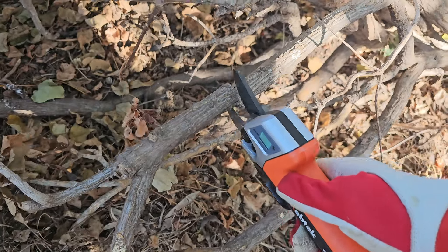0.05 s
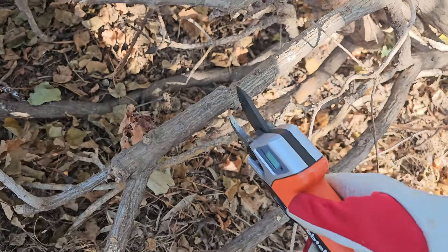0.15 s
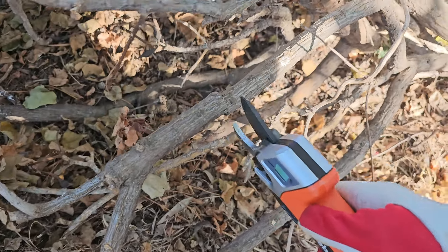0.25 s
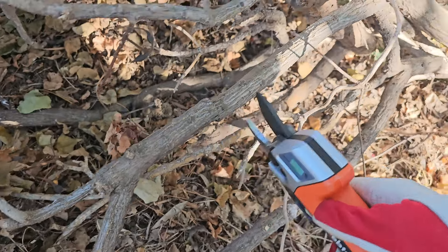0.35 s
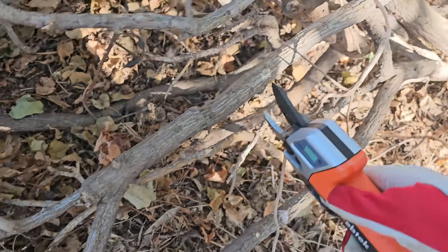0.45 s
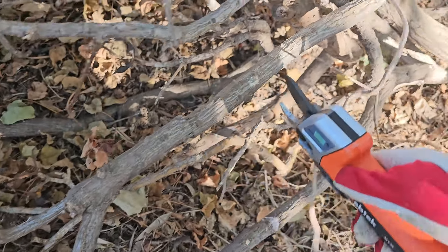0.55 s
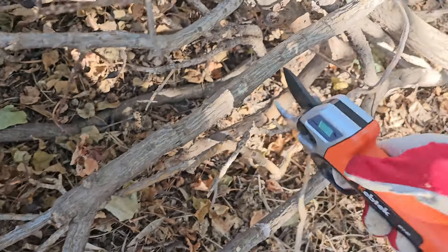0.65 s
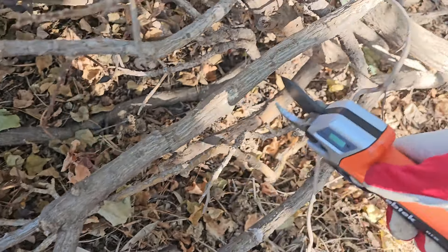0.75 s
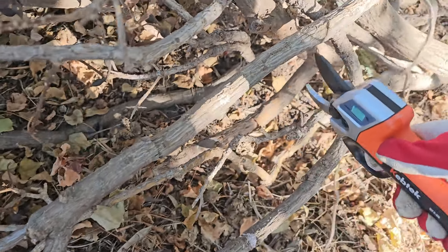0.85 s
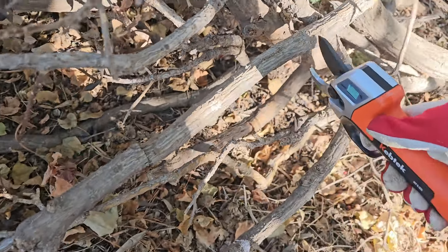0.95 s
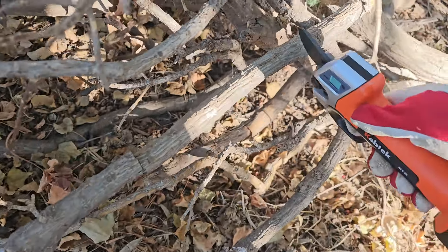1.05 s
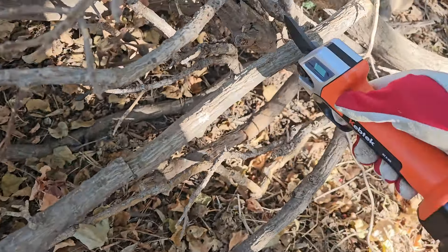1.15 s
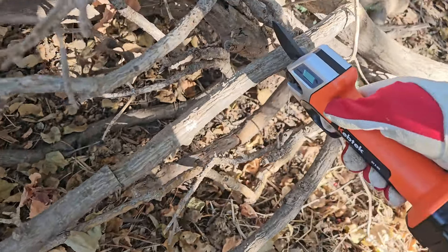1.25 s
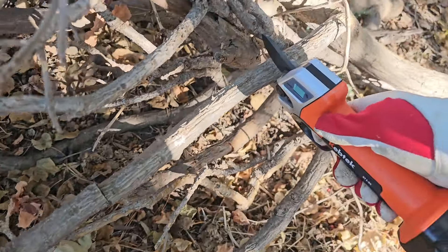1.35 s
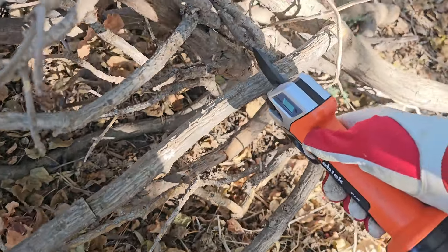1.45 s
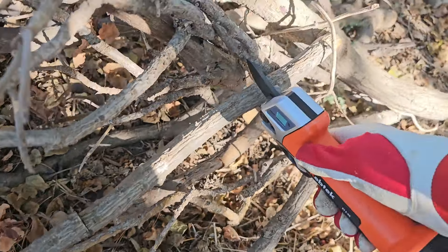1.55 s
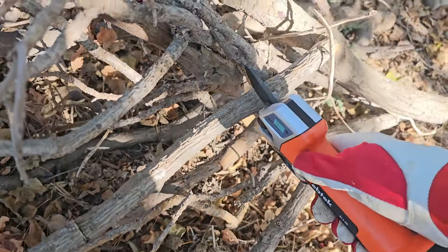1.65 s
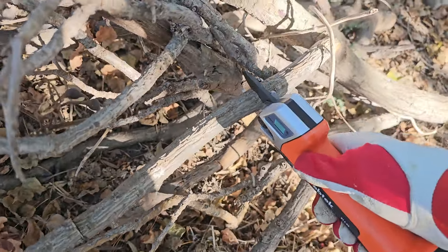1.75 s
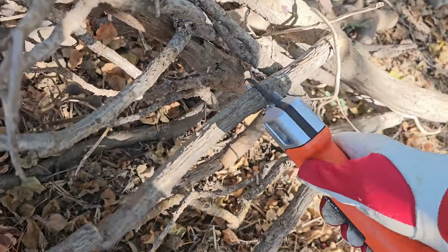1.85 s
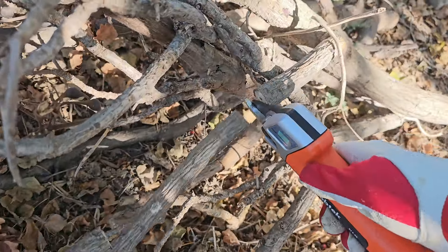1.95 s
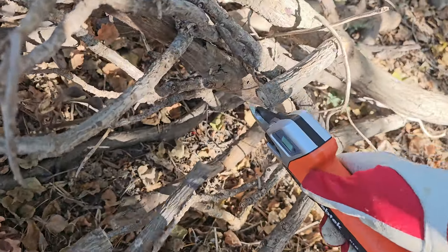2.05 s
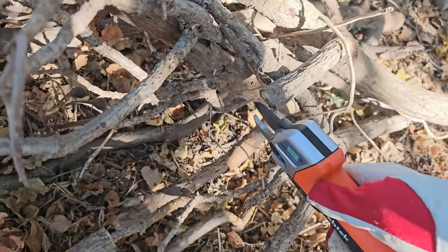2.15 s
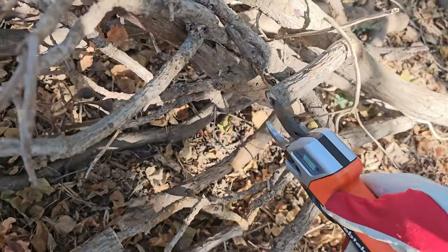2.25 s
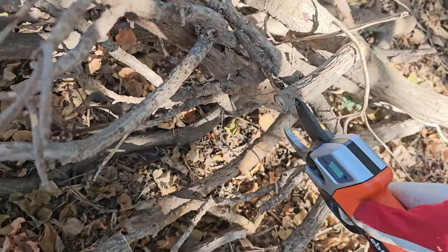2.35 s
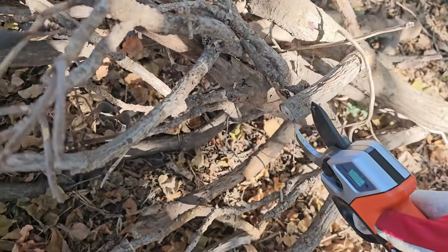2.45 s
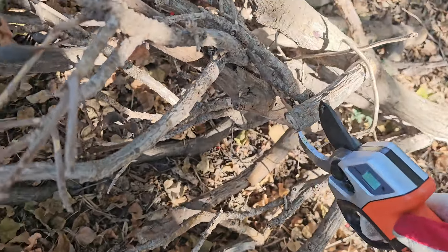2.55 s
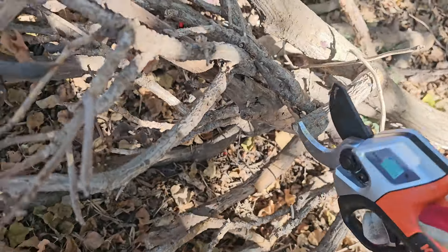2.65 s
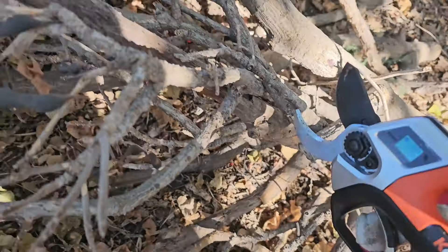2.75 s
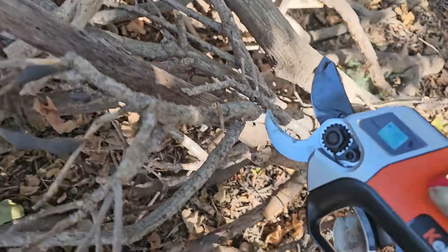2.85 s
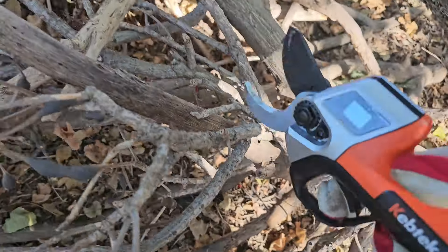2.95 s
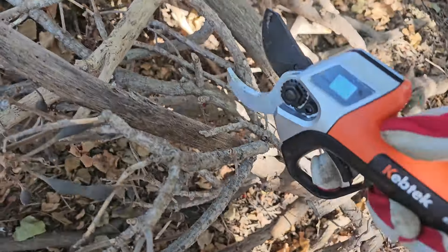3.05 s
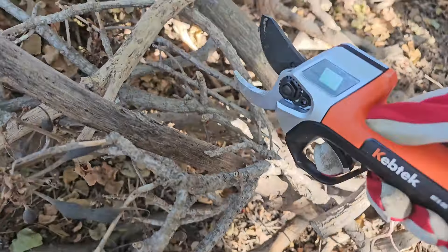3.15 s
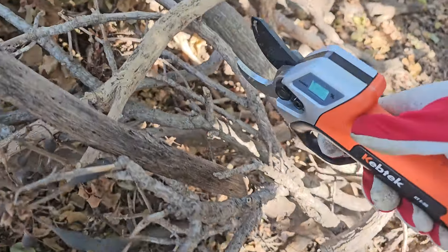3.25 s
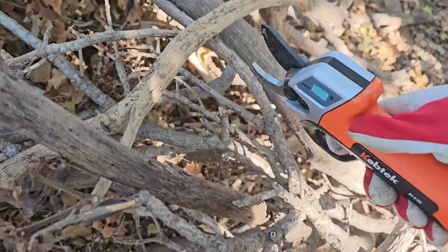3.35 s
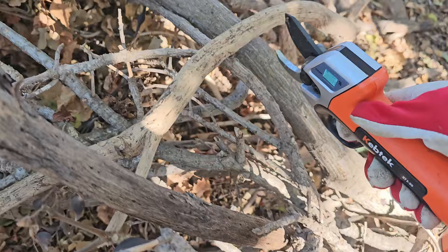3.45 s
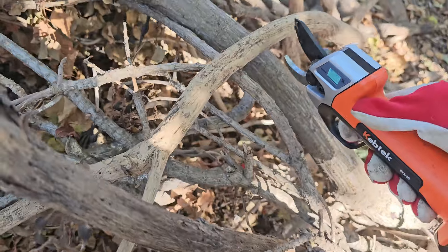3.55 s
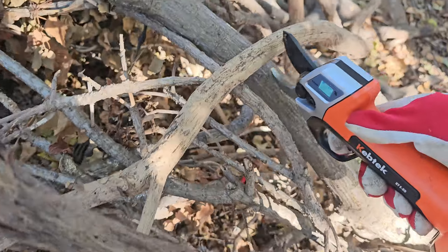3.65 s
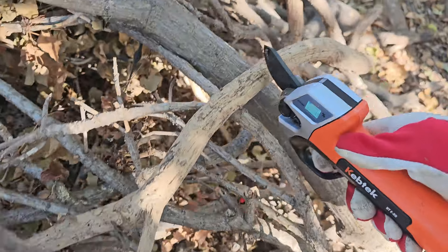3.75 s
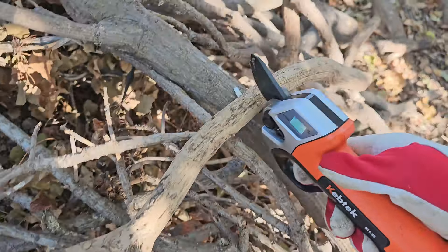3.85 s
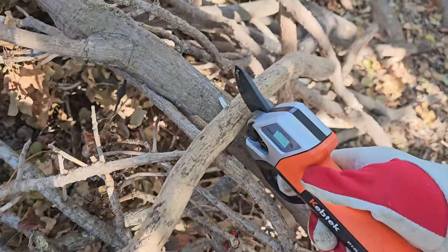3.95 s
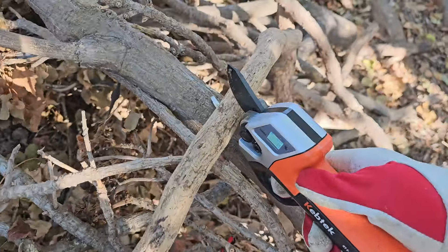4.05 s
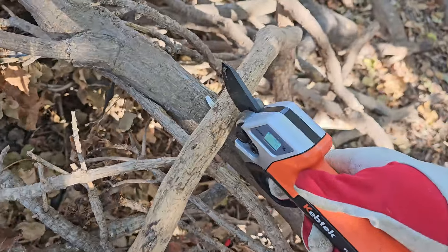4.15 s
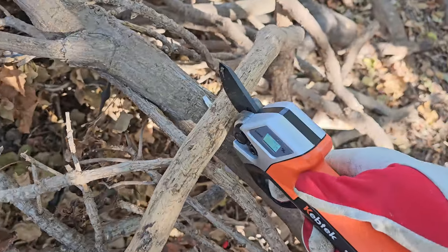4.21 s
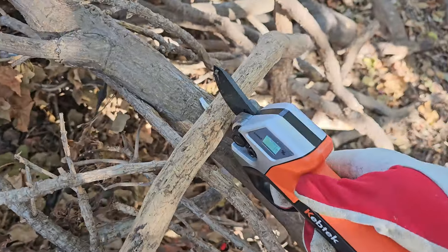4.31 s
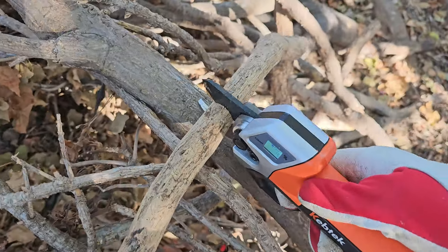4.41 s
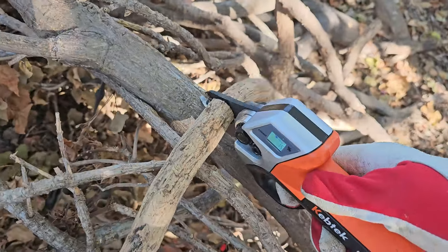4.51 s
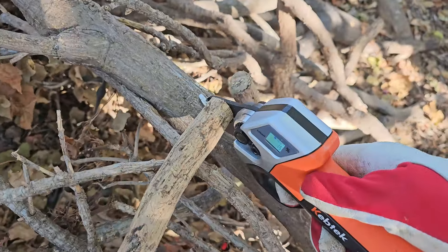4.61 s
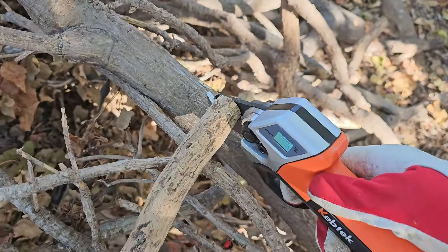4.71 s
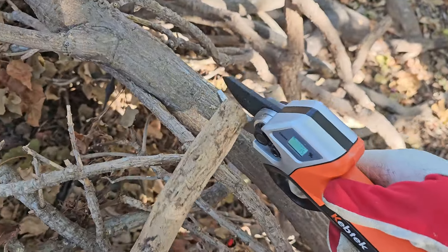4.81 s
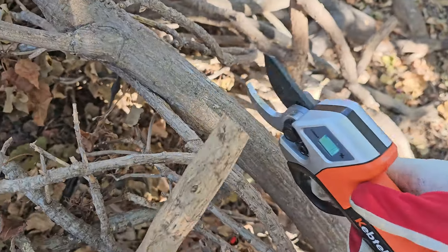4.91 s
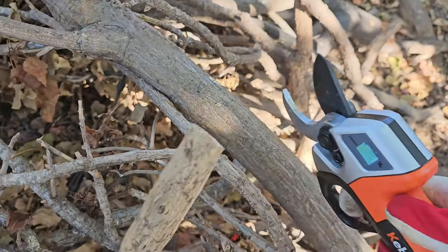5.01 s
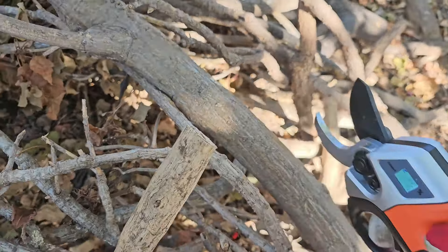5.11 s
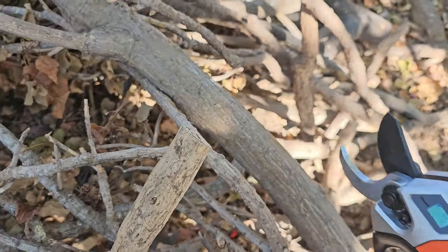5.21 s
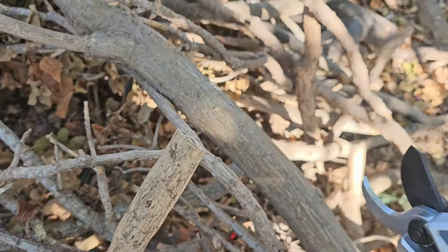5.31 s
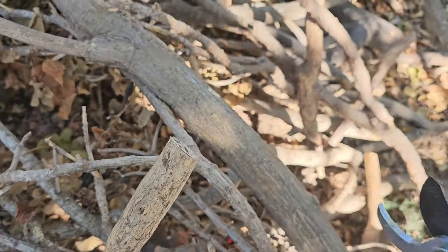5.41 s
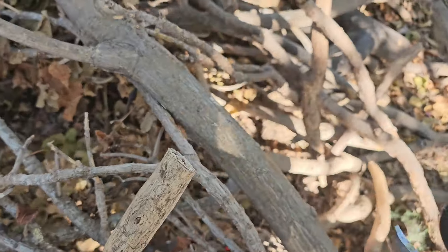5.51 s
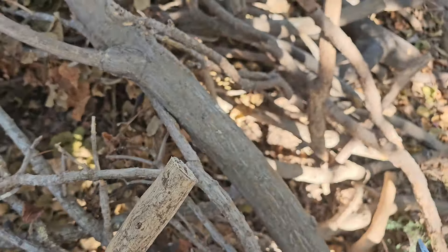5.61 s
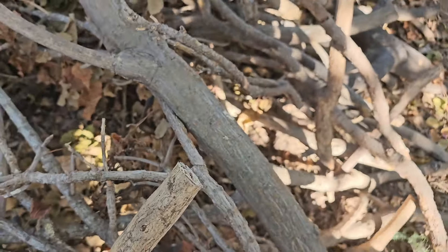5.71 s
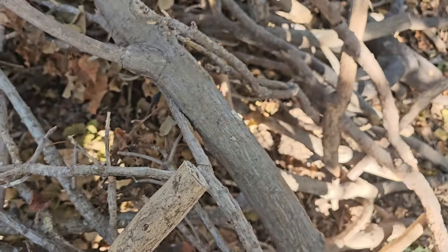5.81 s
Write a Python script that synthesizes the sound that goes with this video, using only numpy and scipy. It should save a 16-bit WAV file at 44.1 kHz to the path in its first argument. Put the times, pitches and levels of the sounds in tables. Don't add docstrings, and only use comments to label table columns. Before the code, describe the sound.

A small geared motor winds down, then twice clicks, whines and bites through wood with a loud crack, as dry leaves and twigs rustle.

```python
import sys
import numpy as np
from scipy import signal
from scipy.fft import rfft, irfft
from scipy.io import wavfile
from scipy.ndimage import uniform_filter1d

SR = 44100
rng = np.random.default_rng(int(sys.argv[2]) if len(sys.argv) > 2 else 0)


def bounce(signal):
    frames = np.transpose(np.atleast_2d(signal))
    limited = np.clip(frames, -1, 1)
    pcm = np.round(limited * 32767).astype(np.int16)
    wavfile.write(sys.argv[1], SR, pcm)


def linear_from_db(decibels):
    return 10 ** (np.asarray(decibels, float) / 20)


N = 258867

# (power on [s], power off [s], rattle [dB], whine [dB], brightness [dB])
OPENING = [
    (-.2, 0.092, -34.5, -35.5, -11),
    (2.114, 2.36, -34, -34.5, -9),
    (4.79, 5.04, -32.5, -28, -9),
]
# (power on [s], power off [s], rattle [dB], whine [dB], brightness [dB])
CLOSING = [
    (1.728, 1.974, -34, -27.5, -8.5),
    (4.364, 4.614, -31, -21.5, -9),
]
# (time [s], speed lost as whine [Hz], crush above rattle [dB], strained line [dB], groan [dB])
RESISTANCE = [
    (1.9, 471.2, 14, -29, -33),
    (4.51, 390, 9.5, -27.5, -38.5),
]
# (left-right [dB], left leads [rad], turning [dB/s])
WHINE_AIM = [
    (-13.5, 1.2, 0),
    (-9.5, -2.5, -58),
    (8.5, 4, 10),
    (0, 0.5, -2),
    (-1, -0.5, 0),
]
GEAR_HZ = [780.6, 985, 1561, 1647, 2304, 3120, 3375, 3709, 3900, 3951, 4678, 7079, 7327]
# (level [dB], left-right [dB], change along the stroke [dB/s])
GEARS = [(-4.5, -0.5, 12), (-4, 1, 11), (-9.5, 3, -19), (-6, 4, -22), (-7.5, -11, 0), (-5.5, 2, -19),
         (-14.5, 5, -3), (-4.5, 7, -4), (-2, -2, -22), (-7, 11, -12), (-11, 2, 3), (-17, 2, 0),
         (-5, 11, 16)]
# (frequency [Hz], density [dB per Hz])
FREE_COLOUR = [(240, -17), (400, -17), (710, -4.5), (777, -1), (970, 4), (1210, -5), (1590, 3.5),
               (2180, -15.5), (3520, 1.5), (3810, -5), (4940, -2), (5410, -4.5), (5860, -9.5), (7500, -2),
               (9000, -12), (11700, -99), (19800, -120)]
# (frequency [Hz], density [dB per Hz])
LOADED_COLOUR = [(240, -21), (400, -30.5), (656, -15), (738, -10), (1190, -13), (1450, 4), (2010, -22.5),
                 (2090, -8.5), (3170, -8.5), (3570, -9.5), (3960, -6.5), (4940, -9.5), (5630, -18),
                 (7310, -8.5), (9000, -19), (11700, -35.5), (19800, -120)]
# (frequency [Hz], width [Hz], level [dB])
HOUSING = [(1345, 130, -9), (3900, 100, 0)]
# (delay [s], left [dB], right [dB])
ECHOES = [(.0011, -6, -8), (.0023, -9, -7), (.0041, -11, -12), (.0068, -14, -12), (.011, -17, -18)]
# (time [s], rustle [dB], brightness [dB])
RUSTLE = [(0, -52, -10), (.24, -63.5, 3), (.6, -64, -54), (.88, -59, -18), (1.07, -55, -12),
          (1.19, -57, -6), (1.37, -52.5, -2), (1.46, -57, -6), (1.72, -60, -13), (2.07, -50.5, -5),
          (2.46, -63.5, 0), (2.87, -60, -8), (3.5, -57, -7), (3.57, -51, 0), (3.68, -44, 5),
          (4.1, -48.5, 2), (4.75, -50, -8), (5.1, -51.5, 0), (5.31, -58.5, 0.5), (5.46, -54, -0.5),
          (5.7, -50, -1), (5.78, -45, 1), (5.87, -46.5, 4)]
# (time [s], peak [dB], time to fall 10 dB [s], brightness [dB], low crush [dB])
CRUSHES = [(0.649, -53, -0.21, -12, -1.5), (0.754, -44.5, 0.03, 2, -4), (0.911, -47.5, -0.07, 5, -6),
           (0.95, -44, 0.0843, 0, -3.5), (1.274, -49.5, -0.05, 4, -6), (2.178, -35, 0.0674, -0.5, -14),
           (2.285, -38, 0.0228, 7.5, -16), (2.31, -36, 0.0165, 5, -7), (2.899, -53, 0.2, 3.5, -24),
           (3.022, -41, 0.08, 1.5, -8), (3.13, -48.5, 0, -10, -4), (3.238, -53.5, 0.24, 1, 4),
           (5.075, -40, 0.04, -15, -3.5), (5.333, -43.5, 0.02, 3, -7.5), (5.398, -50, -1.13, 5, -7)]
# (frequency [Hz], density [dB per Hz])
LEAVES = [(1470, -46), (2500, -14), (3220, 6.5), (3590, 5.5), (4250, 8.5), (5070, 4), (7560, 2), (9900, -7),
          (11500, -1), (15100, -1), (15700, 3)]
# (frequency [Hz], width [Hz], level [dB])
LEAF_RINGS = [(4450, 450, 2), (7550, 610, 2), (11650, 800, 2.5)]
# (time [s], level [dB])
GUSTS = [
    (0.0, -44),
    (0.39, -43),
    (1.11, -46),
    (1.44, -42),
    (2.52, -50),
    (2.83, -45),
    (2.93, -47.5),
    (5.87, -51.5),
]
# (time [s], peak [dB], left-right [dB], length [s])
BUFFETS = [(0.04, -32, -4.0, 0.05), (0.239, -37.5, -5, 0.051), (0.523, -27, 0, 0.048),
           (0.739, -40, -4, 0.093), (1.313, -28, -11.5, 0.06), (1.628, -23.5, 9, 0.045),
           (1.859, -36.5, 0.5, 0.066), (2.195, -30, -5, 0.054), (2.529, -31.5, -3.0, 0.037),
           (2.64, -29.5, 6.5, 0.056), (2.713, -29.5, 8, 0.056), (2.875, -34, -7, 0.089),
           (2.983, -43, -9, 0.033), (3.236, -39, -2.5, 0.1), (3.45, -32.5, 7, 0.043),
           (3.915, -31, 9.5, 0.065), (4.208, -34.5, 3, 0.1), (4.554, -41, 1, 0.14), (5.039, -33, 9, 0.032),
           (5.845, -33.5, -6, 0.052)]
# (frequency [Hz], density [dB per Hz])
WIND = [(11, -59.5), (18, -2.5), (43, -1), (70, 1.5), (97, -2.5), (172, -19), (246, -24.5), (260, -18),
        (340, -35.5), (570, -120)]
# (frequency [Hz], density [dB per Hz])
AIR = [(88, -1.5), (150, -8), (226, 0), (274, -7.5), (353, -7), (501, -8), (658, -11), (1160, -19.5),
       (1330, -13), (4610, -24.5), (7490, -28), (10200, -36), (15700, -29)]
# (frequency [Hz], width [Hz], level [dB])
HUM = [(280.2, 4.97, -59.5), (99.8, 9.02, -58), (504, 67, -68.5)]
# (time [s], peak [dB], ring [Hz], t60 [s])
KNOCKS = [(0.12, -32.5, 1400, .12), (0.551, -43.5, 980, 0.07), (0.87, -48, 910, 0.053),
          (1.283, -34.5, 1190, 0.054), (1.286, -39, 237.6, 0.0054), (1.745, -27, 1350, 0.1),
          (2.128, -28, 1440, 0.12), (2.375, -30.5, 1400, 0.19), (2.993, -40.5, 990, 0.09),
          (3.023, -43, 830, 0.18), (3.045, -49, 1019, .06), (3.074, -42, 853.2, 0.068),
          (3.102, -39.5, 756, .06), (3.228, -27, 1500, 0.17), (3.23, -35, 540, 0.18),
          (3.235, -38, 2900, 0.071), (3.249, -29, 228, 0.17), (3.251, -39, 780, 0.21),
          (3.27, -34, 702, 0.18), (3.6, -37, 756, 0.071), (4.1, -42, 1610, 0.065),
          (4.384, -25.5, 1120, 0.033), (4.529, -17.5, 864, 0.04), (4.813, -23.5, 1490, 0.037),
          (5.068, -30, 1440, 0.063), (5.592, -36, 2200, .02), (5.749, -31.5, 1200, 0.028)]
# (time [s], peak [dB], ring [Hz])
TICKS = [(0.2674, -37.5, 4500), (0.33, -43, 14200), (0.395, -46, 14500), (0.611, -37, 2800),
         (0.6496, -34, 3440), (0.761, -21, 12500), (0.878, -48, 3280), (0.893, -33.5, 4710),
         (0.909, -44, 4240), (1.0947, -47, 3050), (1.1144, -39, 3060), (1.1478, -31.5, 4160),
         (1.1752, -51, 6070), (1.2141, -40, 3840), (1.2506, -41, 7910), (1.5025, -47, 4340),
         (1.5656, -33.5, 4900), (1.7055, -35, 4720), (2.477, -36, 4260), (2.8876, -40, 4230),
         (2.9068, -25, 5650), (3.065, -25, 4270), (3.08, -23.5, 4200), (3.1586, -29, 6500),
         (3.1772, -37, 4300), (3.236, -22, 2950), (3.332, -35, 4270), (3.4095, -29, 6010),
         (3.5633, -33, 4490), (3.697, -21, 4300), (3.7322, -17, 11500), (3.8364, -18.5, 4490),
         (3.9837, -23, 5920), (4.017, -16.5, 7470), (4.0442, -20, 14500), (4.1658, -21, 5860),
         (4.2767, -25.5, 4380), (4.322, -25, 7500), (4.333, -26.5, 4400), (5.1787, -27, 7750),
         (5.4804, -40, 4250), (5.49, -33.5, 1950), (5.5333, -44, 4300), (5.6311, -26, 12000),
         (5.6506, -28, 7580), (5.6605, -25, 4740), (5.7034, -24.5, 3120), (5.7404, -24, 6730),
         (5.8591, -12.5, 6100)]
# (time [s], peak [dB], ring [Hz], crack above ring [dB])
TWIGS = [(0.3096, -40.5, 9000, 1), (0.386, -44, 11000, 4), (0.647, -47, 4340, -15),
         (0.6643, -33, 3660, -24), (0.746, -41, 12000, -8), (0.829, -45, 12000, -13),
         (0.9441, -10, 4600, 8), (0.9452, -7, 15600, -15), (0.9467, -13.5, 4370, -1),
         (0.996, -23, 13500, -3), (0.998, -27, 3200, -15), (1.0035, -27, 3300, -10),
         (1.0356, -21.5, 5370, 6), (1.0355, -29, 12500, -6), (1.455, -30, 6000, 9),
         (1.4648, -32.5, 5030, -9), (2.637, -29.5, 1800, 12), (2.771, -37, 2930, 2),
         (2.886, -29.5, 7240, -1), (3.002, -26, 8550, 2), (3.023, -22, 5900, -12), (3.06, -43, 4370, -10),
         (3.1285, -24, 6000, -29), (3.217, -33, 1500, 2), (3.3728, -31, 1350, 17), (3.442, -30, 1350, 18),
         (3.479, -28.5, 1090, -13), (3.5262, -23.5, 6500, 9), (3.675, -22, 7100, -15),
         (4.117, -18.5, 6260, -23), (5.3285, -26.5, 5540, 0), (5.356, -26, 6900, -9),
         (5.393, -25.5, 6140, -15), (5.5914, -37, 8000, -6), (5.7483, -38, 5000, -4),
         (5.787, -17.5, 6550, -22)]
# (time [s], peak [dB], left-right [dB])
TRIGGER = [
    (1.719, -24.5, 4),
    (2.106, -24.5, 3),
    (4.354, -25, 14),
    (4.768, -22, 3),
]
# (frequency [Hz], level [dB], t60 [s])
SWITCH = [(880, -6, 0.13), (1350, -2, 0.09), (1704, 2, 0.037), (2120, -5, 0.032), (3660, -3, 0.032),
          (4720, 5, 0.023), (5220, 8, 0.02), (6500, -3, 0.018)]
# (time [s], peak [dB], ring [Hz], t60 [s])
SNAPS = [(1.8503, -14, 3540, 0.015), (1.8545, -19, 5600, 0.01), (1.867, -23, 5200, 0.016),
         (1.8892, -11, 3410, 0.015), (1.8943, -11, 4200, 0.0053), (1.8975, -32, 6500, 0.0071),
         (1.904, -31, 3600, .008), (1.9063, -4, 4400, 0.0088), (1.9134, -16, 3820, 0.022),
         (1.9223, 0.5, 4450, 0.0063), (1.9242, -6.5, 2730, 0.012), (1.9248, -12, 1610, 0.035),
         (1.928, -18, 3500, .012), (1.9305, -10, 6500, 0.0048), (1.936, -35, 7000, .008),
         (1.948, -15, 1730, 0.04), (1.9488, -13, 4270, 0.009), (1.954, -9, 4500, 0.0088),
         (1.961, -16.5, 3500, 0.0097), (1.965, -24, 3470, .008), (4.4723, -14, 3400, 0.041),
         (4.4882, -15.5, 3440, .025), (4.501, -17, 6960, 0.0088), (4.5148, -8, 5700, 0.013),
         (4.5165, -15, 4300, 0.016), (4.522, 2.5, 4200, 0.0038), (4.5253, -3.5, 4100, 0.0057),
         (4.5284, -2, 4200, 0.0074), (4.53, -2.5, 2770, 0.017), (4.533, -10, 3280, 0.017),
         (4.5361, -16, 2700, .012), (4.5415, -26, 4400, .01), (4.548, -19, 3500, .02),
         (4.5576, -11.5, 3580, 0.024), (4.558, -17.5, 1580, 0.027), (4.559, -8, 7150, 0.0089),
         (4.571, -18, 3300, .015), (4.577, -13, 3600, 0.013), (4.582, -16, 3640, .01),
         (4.5853, -13, 3600, 0.0056), (4.591, -21, 3320, 0.013), (4.595, -20, 4100, .008)]

FULL_HZ, REST_HZ, SPIN_UP_HZ_PER_S, COAST_S, STOP_S = 5270, 798, 100000, .043, .096
SAG_POWER = 1.6
BITE_S, LET_GO_S, CRUSH_LAG_S = .1, .12, 0.02
SWELL_DB_PER_S, START_SHARE, COAST_DB_PER_S = 1.5, 0.54, 81
FREE_LINES_DB, LOADED_LINES_DB = -10, -14.5
WHINE_SWELL_DB_PER_S, WHINE_COAST_DB_PER_S, WHINE_BURIED_DB, WHINE_SPEED_DB = 16.5, 380, 27, 260
WHINE_GONE_S = .018
UNSTEADY_DB = 18
GEAR_WOBBLE_RAD, GEAR_FLUTTER_DB = .5, 3.2
STRAINED_HZ, STRAIN_RANGE_DB, STRAIN_FADE_DB = 3709, 28, 33
GROAN_HZ, GROAN_SAG_HZ, GROAN_RANGE_DB, GROAN_WOBBLE_RAD = 1580, 213.6, 11.5, 1.3
SETTLE_DB, SETTLE_S = -2.5, 0.036
CRUSH_RISE_DB_PER_S, LOW_CRUSH_DB = 708, -4.5
AIR_DB = -53
BUFFET_LOSS_DB = 8

SIDES = np.array([[.5], [-.5]])


def rms_one(x):
    return x / np.sqrt(np.mean(x ** 2) + 1e-20)


def in_time(rows):
    s, *values = np.transpose(rows)
    t = np.arange(N) / SR
    return [uniform_filter1d(np.interp(t, s, v), size=200) for v in values]


def colour(x, points, peaks=()):
    hz = np.arange(8193) * SR / 16384 + 1
    point_hz, point_db = np.transpose(points)
    db = np.interp(np.log(hz), np.log(point_hz), point_db)
    for centre_hz, width, top_db in peaks:
        db = db + top_db / (1 + (2 * (hz - centre_hz) / width) ** 2)
    cepstrum = irfft(db * np.log(10) / 20)
    cepstrum[1:8192] *= 2
    cepstrum[8193:] = 0
    response = irfft(np.exp(rfft(cepstrum)))[None, :8192]
    return rms_one(signal.fftconvolve(np.atleast_2d(x), response, axes=1)[:, :N])


def butter(x, order, hz, kind):
    return signal.sosfilt(signal.butter(order, hz, kind, fs=SR, output="sos"), x)


def passband(x, low_hz, high_hz, order=2):
    return rms_one(butter(x, order, [low_hz, min(high_hz, .45 * SR)], "band"))


def drift(rate):
    r = np.exp(-80 * np.pi * rate / SR)
    noise = rng.standard_normal(N // 40 + 2002)
    slow = signal.lfilter([1], [1, -2 * r, r * r], noise)[2000:]
    return np.interp(np.arange(N) / 40, np.arange(len(slow)), rms_one(slow))


def pair(shared, own, alike):
    alike = np.clip(alike, 0, 1)
    return np.sqrt(1 + alike) * shared + np.sqrt(1 - alike) * own * [[1], [-1]]


def grains(per_s, spread_db, hiss_db):
    sizes = linear_from_db(spread_db * np.minimum(rng.exponential(1, (2, N)), 5))
    sizes = sizes * rng.choice([-1, 1], (2, N))
    clicks = rms_one(sizes * (rng.random((2, N)) < per_s / SR))
    return clicks + linear_from_db(hiss_db) * rng.standard_normal((2, N))


def place(x, lean_db, lag, echo_db):
    t = np.arange(N)
    out = np.atleast_2d(x) * linear_from_db(SIDES * lean_db)
    out[0] = np.interp(t - round(lag), t, out[0])
    highs = signal.lfilter(*signal.butter(2, 2500, "high", fs=SR), out)
    for delay, left_db, right_db in ECHOES:
        for side, db in enumerate((left_db, right_db)):
            d = round(delay * SR * (1 + 0.25 * side))
            out[side, d:] += linear_from_db(db + echo_db) * highs[side, :-d] * (-1) ** side
    return out


def add(out, s, burst, pan_db):
    i = round(s * SR)
    n = min(burst.shape[-1], N - i)
    out[:, i:i + n] += burst[..., :n] * linear_from_db(SIDES * pan_db)


def per_stroke(rows, level):
    t, out = np.arange(N) / SR, np.full(N, -120.)
    for k, row in enumerate(rows):
        turning = (t > row[0]) & (t < row[1] + STOP_S)
        out = np.where(turning, level(k, t - row[0], t - row[1]), out)
    return uniform_filter1d(out, size=200)


def held_speed(loads):
    return FULL_HZ - sum(load ** SAG_POWER * row[1] for load, row in zip(loads, RESISTANCE))


def speed_and_load():
    t, speed = np.arange(N) / SR, np.full(N, float(REST_HZ))
    loads = [np.interp(t, [s - BITE_S, s, s + LET_GO_S], [0, 1, 0]) for s, *_ in RESISTANCE]
    held = held_speed(loads)
    for on, off, *_ in OPENING + CLOSING:
        ramp = np.minimum(REST_HZ + SPIN_UP_HZ_PER_S * (t - on), held)
        late = np.maximum(t - off, 0) / COAST_S
        speed = np.where((t > on) & (t < off + STOP_S), ramp * np.exp(-late), speed)
    return uniform_filter1d(speed, size=450).clip(0, FULL_HZ), loads


def gearbox(level_db, top_db, spectrum, peaks, per_s, spread_db):
    shake = grains(per_s, spread_db, hiss_db=-4.5)
    body = pair(*colour(shake, spectrum, peaks), alike=0.38)
    fizz = pair(*passband(shake, 10300, 20800), alike=0.16)
    return linear_from_db(level_db - 6.5) * (body + linear_from_db(top_db) * fizz)


def whine(turn, speed, loads, passed):
    strokes, held = OPENING + CLOSING, held_speed(loads)

    def whine_level(k, on, off):
        powered = WHINE_SPEED_DB * np.log10(speed / held) + WHINE_SWELL_DB_PER_S * off
        coasting = -WHINE_COAST_DB_PER_S * off * (1 + off / WHINE_GONE_S)
        return strokes[k][3] + np.where(off < 0, powered, coasting)

    smothered = per_stroke(CLOSING, lambda k, on, off: np.clip(2 * (passed - k), 0, 1) ** .5).clip(0)
    whine_db = per_stroke(strokes, whine_level) - WHINE_BURIED_DB * smothered
    whine_db = whine_db + UNSTEADY_DB * (1 - speed / FULL_HZ) ** .5 * drift(90).clip(-3, .7)
    aim_db = per_stroke(strokes, lambda k, on, off: WHINE_AIM[k][0] + WHINE_AIM[k][2] * off).clip(-30)
    lead = per_stroke(strokes, lambda k, on, off: WHINE_AIM[k][1])
    return np.sqrt(2) * linear_from_db(whine_db + SIDES * aim_db + 0.17 * drift(33)) * np.sin(turn + SIDES * lead)


def gear_lines(line_db, turn, speed):
    along = per_stroke(OPENING + CLOSING, lambda k, on, off: off).clip(-.3, 0)
    impact = (speed / FULL_HZ) ** 2.2
    impact = impact * linear_from_db(1.9 * np.clip(np.gradient(speed), 0, 1))
    out = np.zeros((2, N))
    for hz, (db, pan_db, change_db) in zip(GEAR_HZ, GEARS):
        flutter = linear_from_db(GEAR_FLUTTER_DB * drift(49) + 0.44 * drift(7.6))
        level = linear_from_db(line_db + db + 2.5 + SIDES * pan_db + change_db * along)
        wobble = GEAR_WOBBLE_RAD * drift(12) + SIDES * rng.uniform(-1.5, 1)
        out += level * impact * flutter * np.sin(turn * hz / FULL_HZ + wobble)
    return out


def strained_line(turn, loads, passed):
    def strain_level(k, on, off):
        unloaded = STRAIN_RANGE_DB * (1 - loads[k]) ** 2
        return RESISTANCE[k][3] - unloaded - STRAIN_FADE_DB * (passed - k) ** 3

    level = linear_from_db(per_stroke(CLOSING, strain_level) + 3 + SIDES * 4 + 4.5 * drift(60))
    return level * np.sin(turn * STRAINED_HZ / FULL_HZ + 1.2 * drift(40))


def groan(speed, loads, passed):
    def groan_level(k, on, off):
        loaded = -GROAN_RANGE_DB * (1 - loads[k])
        settling = SETTLE_DB - 10 * np.abs(off - STOP_S + SETTLE_S) / SETTLE_S
        return RESISTANCE[k][4] + np.maximum(loaded, settling)

    groan_db = per_stroke(CLOSING, groan_level)
    hz = GROAN_HZ - GROAN_SAG_HZ * per_stroke(CLOSING, lambda k, on, off: passed - k).clip(0)
    outside_cut = passed % 1 < .01
    slow_db = 11.0 * np.log10(speed / FULL_HZ) * outside_cut
    level = linear_from_db(groan_db + 0.5 + SIDES * 6.6 + slow_db + 3.5 * drift(55))
    return level * np.sin(2 * np.pi * np.cumsum(hz) / SR + GROAN_WOBBLE_RAD * drift(51))


def motor_tones(line_db, speed, loads):
    turn, load = 2 * np.pi * np.cumsum(speed) / SR, sum(loads)
    passed = np.cumsum(load) / load.sum() * len(loads)
    tones = whine(turn, speed, loads, passed) + gear_lines(line_db, turn, speed)
    return tones + strained_line(turn, loads, passed) + groan(speed, loads, passed)


def motor():
    speed, loads = speed_and_load()
    start_db = START_SHARE * 20 * np.log10(speed / FULL_HZ)

    def free_level(k, on, off):
        return OPENING[k][2] + np.where(off < 0, SWELL_DB_PER_S, -COAST_DB_PER_S / 2) * off

    def run_level(k, on, off):
        return CLOSING[k][2] - COAST_DB_PER_S / 2 * off.clip(0)

    free_db = start_db + per_stroke(OPENING, free_level)
    run_db = start_db + per_stroke(CLOSING, run_level)
    crush_db = sum(load * row[2] for load, row in zip(loads, RESISTANCE))
    crush_db = np.roll(crush_db, round(CRUSH_LAG_S * SR))
    free_top_db = per_stroke(OPENING, lambda k, on, off: OPENING[k][4])
    cut_top_db = per_stroke(CLOSING, lambda k, on, off: CLOSING[k][4])
    free = gearbox(free_db, free_top_db, FREE_COLOUR, (), per_s=4000, spread_db=-3.0)
    loaded = gearbox(run_db + crush_db, cut_top_db, LOADED_COLOUR, HOUSING, per_s=2500, spread_db=3.0)
    line_db = np.maximum(free_db + FREE_LINES_DB, run_db + LOADED_LINES_DB)
    return free + loaded, motor_tones(line_db, speed, loads)


def stirring():
    t = np.arange(N) / SR
    level_db, top_db = in_time(RUSTLE)
    power = linear_from_db(2 * np.array([level_db, level_db + top_db, level_db + LOW_CRUSH_DB]))
    for s, db, fall_s, top_db, low_db in CRUSHES:
        slope = np.where(t < s, CRUSH_RISE_DB_PER_S, -10 / max(fall_s, .01))
        shape_db = db + slope * (t - s)
        power += linear_from_db(2 * shape_db.clip(-150)) * linear_from_db(2 * np.array([[0], [top_db], [low_db]]))
    return np.sqrt(power)


def leaves():
    level, top, low = stirring()
    patchy = np.clip((-44 - in_time(RUSTLE)[0]) / 12, .2, 1)
    rate = 1500 * linear_from_db(4.0 * patchy * drift(12))
    crackle = grains(rate, spread_db=3.5, hiss_db=0.5 + 5 * (1 - patchy))
    bright = colour(crackle, LEAVES, LEAF_RINGS)
    high = rms_one(np.clip(butter(bright, 4, 8800, "high"), -30, 30))
    middle = rms_one(butter(bright, 4, 8800, "low"))
    foliage = pair(*(level * middle + top * high), alike=0.0066)
    bark = low * pair(*passband(np.tanh(crackle), 395, 2670), alike=0.17)
    return linear_from_db(1.5 + 2.42 * patchy * drift(56)) * (foliage + bark) * linear_from_db(SIDES * 2.4)


def wind_gain():
    (gust_db,) = in_time(GUSTS)
    t = np.arange(N) / SR
    power = np.tile(linear_from_db(2 * (gust_db + 0.68 * drift(30.0))), (2, 1))
    for s, db, pan_db, length in BUFFETS:
        near = slice(max(round((s - length) * SR), 0), round((s + 4 * length) * SR))
        swell = np.exp(-((t[near] - s - length / 2) / length) ** 2 * 2)
        power[:, near] += linear_from_db(2 * (db - BUFFET_LOSS_DB) + 2 * SIDES * pan_db) * swell
    return np.sqrt(power)


def background():
    wind = wind_gain() * pair(*colour(rng.standard_normal((2, N)), WIND), alike=0.77)
    air = linear_from_db(AIR_DB - 5.0) * pair(*colour(rng.standard_normal((2, N)), AIR), alike=0.38)
    hum = 0
    for hz, width, db in HUM:
        cycles = np.cumsum(hz + width / 2 * drift(5.95)) / SR
        hum = hum + linear_from_db(db + 1.9 * drift(0.78)) * np.sqrt(2) * np.sin(2 * np.pi * cycles)
    return wind + air + hum * linear_from_db(SIDES * 3)


def knocks():
    out, t = np.zeros((2, N)), np.arange(6000) / SR
    for s, db, hz, t60 in KNOCKS:
        ring = passband(rng.standard_normal(len(t)), hz * 0.74, hz * 1.21, order=1)
        contact = np.minimum(t / max(t60 * 0.03, .001), 1)
        thud = ring * linear_from_db(-60 * t / max(t60, .005)) * contact
        add(out, s, linear_from_db(db) * thud / np.abs(thud).max(), pan_db=3.0)
    return out


def cracks(rows, top_hz, tail_db, width, alike):
    out, t = np.zeros((2, N)), np.arange(2800) / SR
    sharp = linear_from_db(-60 * t / .005)
    for s, db, hz, crack_db, pan_db, t60 in rows:
        noise = rng.standard_normal((2, 2, len(t)))
        noise[0, :, 2] = 8
        wood = passband(pair(*noise[0], alike), hz / width, hz * width) * linear_from_db(-60 * t / max(t60, .003))
        splinters = linear_from_db(tail_db + .3 * db - 60 * t / .07)
        crack = passband(pair(*noise[1], alike), 930, top_hz, order=1) * (linear_from_db(crack_db) * sharp + splinters)
        burst = wood + crack
        add(out, s, linear_from_db(db) * burst / np.abs(burst).max(axis=1, keepdims=True), pan_db)
    return out


def ticks():
    rows = [(*row, -7, rng.normal(2, 4), .014) for row in TICKS]
    return cracks(rows, top_hz=19000, tail_db=-14, width=1.3, alike=.3)


def twigs():
    rows = [(*row, rng.normal(1.5, 2.5), .015) for row in TWIGS]
    return cracks(rows, top_hz=19000, tail_db=-14, width=1.6, alike=.3)


def trigger():
    out, t = np.zeros((2, N)), np.arange(2000) / SR
    for s, db, pan_db in TRIGGER:
        ring = linear_from_db(0.5 - 60 * t / 0.022) * rng.standard_normal(len(t))
        for hz, mode_db, t60 in SWITCH:
            strength_db = mode_db + rng.normal(0, 1.3)
            ring = ring + linear_from_db(strength_db - 60 * t / t60) * np.sin(2 * np.pi * hz * t)
        ring = ring * np.minimum(t / 0.0011, 1)
        add(out, s, linear_from_db(db) * ring / np.abs(ring).max(), pan_db)
    return out


def snaps():
    rows = [(s, db, hz, -5 + .3 * db, rng.normal(2.5, 2), t60) for s, db, hz, t60 in SNAPS]
    return cracks(rows, top_hz=13000, tail_db=-20, width=1.14, alike=.35)


def scene():
    rattle, tones = motor()
    shears = linear_from_db(1.0) * place(rattle, lean_db=3.5, lag=2, echo_db=-0.5) + tones
    surroundings = leaves() + background() + knocks()
    breaks = linear_from_db(-4) * ticks() + twigs() + trigger() + snaps()
    return shears + linear_from_db(0.84) * place(breaks, lean_db=1, lag=1, echo_db=-8) + surroundings


def roll_off(x):
    return signal.sosfilt(signal.butter(12, 17020, fs=SR, output="sos"), x)


def record(dry):
    below = signal.sosfilt(signal.ellip(10, .5, 45, 15900, fs=SR, output="sos"), dry)
    mix = 0.92 * np.tanh(below / 1.015)
    return roll_off(mix)


dry = scene()
out = record(dry)
bounce(out)
```